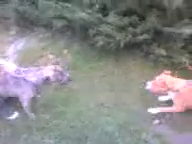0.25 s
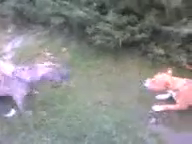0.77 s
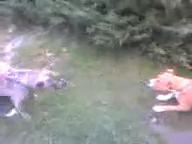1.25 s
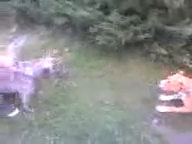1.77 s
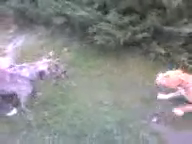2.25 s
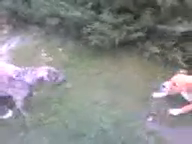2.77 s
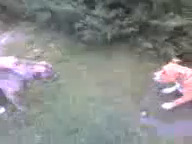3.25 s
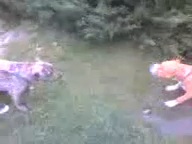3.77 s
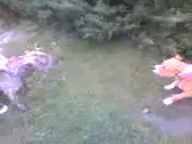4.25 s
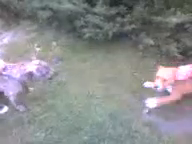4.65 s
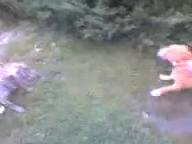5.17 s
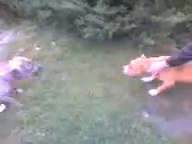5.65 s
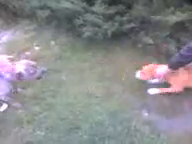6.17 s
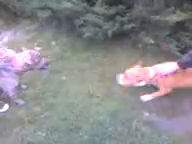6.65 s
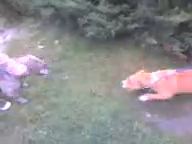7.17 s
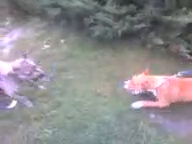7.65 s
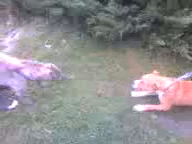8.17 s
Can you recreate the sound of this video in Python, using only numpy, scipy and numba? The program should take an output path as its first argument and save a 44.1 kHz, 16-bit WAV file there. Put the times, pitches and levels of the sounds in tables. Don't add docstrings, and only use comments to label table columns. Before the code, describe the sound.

Rough falling barks and sharp rising yelps from two excited dogs, with huffs and thin breaths in short pauses, crackly and dull.

```python
import sys
import numpy as np
from scipy import signal
from scipy.fft import rfft, irfft
from scipy.io import wavfile
from scipy.ndimage import uniform_filter1d
from numba import njit

SR = 44100
rng = np.random.default_rng(int(sys.argv[2]) if len(sys.argv) > 2 else 0)


def voltage_ratio(level):
    return 10 ** (np.asarray(level, float) / 20)


def digitize_waveform(pressure):
    field = np.atleast_2d(pressure).T
    bounded = np.clip(field, -1, 1)
    quanta = np.round(bounded * 32767).astype(np.int16)
    wavfile.write(sys.argv[1], SR, quanta)


N = 370881

# start_s, hold_s, level_db, pitch_hz, glide_octaves_per_s
BARKS = [(0.597, .047, -8.5, 749, -4.5), (0.665, .012, -15.5, 727, 0.8), (0.772, 0.018, -7, 669, 8.5),
         (1.476, .04, -10.5, 610, 3.4), (3.645, .05, -24, 700, -1.5), (5.066, .015, -31, 700, -3),
         (5.05, .04, -36, 320, -1.5), (5.685, 0.033, -9.5, 688, -5), (6.53, .05, -23.5, 927, -5),
         (7.96, 0.022, -25.5, 913.6, -2.5), (6.7, 0.028, -10.5, 696.5, -2.7), (7.335, .06, -12, 520, -1.6),
         (6.075, .085, -16, 1220, -1.5), (6.175, .04, -20, 470, -2.2), (0.752, .012, -21, 600, 3),
         (1.461, .008, -22, 600, .3), (6.655, .012, -24, 640, .3), (8.11, 0.048, -11.5, 1070, 1.07)]
# start_s, hold_s, level_db, pitch_hz, glide_octaves_per_s
ROARS = [
    (1.545, 0.037, -14.5, 491.6, 2),
    (2.914, 0.09, -8, 630, -5),
    (3.69, .03, -21, 597.6, -0.5),
    (3.76, .09, -8.5, 640, -6),
    (5.73, .05, -13.5, 523.4, 1.66),
    (6.424, .012, -15.5, 661, -4.5),
    (6.465, 0.022, -9, 542, -4),
]
# start_s, hold_s, level_db, pitch_hz, glide_octaves_per_s
SWELLS = [
    (1.968, .05, -10, 580.6, -1.5),
    (2.275, 0.077, -9, 625, -1.5),
    (4.468, .035, -9, 655, -5.5),
    (6.095, 0.033, -10, 530, -1.1),
    (1.05, 0.033, -24, 574.3, -0.2),
    (7.625, .05, -15, 486.2, 4),
    (7.884, .03, -13, 670, -6),
]
# start_s, hold_s, level_db, pitch_hz, glide_octaves_per_s
YELPS = [(0.0, 0.0021, -14, 1021, -6.5), (7.49, .065, -21, 580, .2), (1.62, 0.027, -8, 948, 1),
         (2.437, 0.068, -8, 727, 9), (3.3, .02, -17, 814.6, 7), (3.325, .04, -5.5, 950, 4),
         (4.342, 0.058, -8, 1029, 3.5), (1.095, 0.034, -29, 1069, -12.5), (5.22, .035, -28, 555.5, 7),
         (8.185, .025, -23, 860, -9), (6.222, 0.046, -12.5, 689, 6), (6.288, .05, -6, 900, 5),
         (7.29, .028, -6, 968, 6.5), (8.135, 0.035, -8, 418, 4.5)]
# start_s, hold_s, level_db, pitch_hz, glide_octaves_per_s
HOOTS = [
    (0.792, 0.025, -15.5, 416.3, 3.5),
    (0.908, 0.0096, -21, 521, 2.5),
    (1.0, 0.027, -23.5, 658.5, 7.5),
    (2.584, 0.0043, -16.5, 498, -7.5),
    (3.276, 0.013, -8, 678, 9.5),
    (5.17, 0.039, -34, 450.8, 4.5),
    (6.405, 0.0097, -22.5, 484, 0.6),
    (6.678, 0.014, -7, 686.5, 1.5),
]
# start_s, hold_s, level_db, pitch_hz, glide_octaves_per_s
CRIES = [
    (0.825, 0.02, -10.5, 465.3, 7),
    (6.755, 0.03, -13.5, 525.6, 6),
    (7.232, .013, -11.5, 597, 2),
    (8.375, 0.036, -23, 575, -1.4),
]
# start_s, hold_s, level_db, pitch_hz, glide_octaves_per_s
ARCHES = [
    (0.485, 0.038, -20, 541, 1.2),
    (1.72, .05, -19.5, 511.6, 3.5),
    (2.09, 0.024, -20.5, 543, -1.8),
]
# start_s, hold_s, level_db, pitch_hz, glide_octaves_per_s
WHINES = [
    (0.16, .13, -44, 298.3, -1.4),
    (0.3, 0.13, -46.5, 263.4, 1.9),
]
# start_s, hold_s, level_db, pitch_hz, glide_octaves_per_s
HUMS = [
    (3.97, .19, -49, 255, -0.21),
    (4.23, .07, -64, 221.3, -0.43),
    (4.85, .045, -58.5, 859.6, 0.58),
    (5.87, 0.21, -37.5, 337, -0.64),
]
# time_s, pulse_rate_hz, level_db
GROWL = [
    (3.945, 133.6, -50),
    (3.977, 126.2, -36),
    (4.05, 111.1, -61.5),
]
# start_s (full breath), hold_s, level_db, mouth_hz, brightness_db
PANTS = [(0.05, 0.045, -30.5, 492, 8), (0.114, 0.099, -35.5, 650, 4.5), (1.885, 0.039, -26, 698, 0),
         (6.002, 0.041, -34.5, 455, 2.5), (7.261, 0.023, -21, 1101, 5.5), (7.579, .03, -20.5, 698, 5.5),
         (0.891, 0.1, -28.5, 930, 5), (2.628, 0.073, -36, 1053, 14), (3.17, 0.1, -51.5, 640, 4.5),
         (3.39, 0.015, -36.5, 800, -0.5), (3.438, .012, -24.5, 600, 3.5), (3.499, 0.043, -36.5, 787, 10),
         (4.26, 0.031, -67, 1040, 6), (4.676, 0.024, -39, 850, 4.5), (4.814, 0.068, -66.5, 950, -9),
         (4.915, 0.026, -51.5, 991, 8), (5.322, .01, -54, 320, -33), (5.499, .05, -57, 450, -6),
         (5.617, 0.0032, -39.5, 730, 1.5), (6.94, 0.038, -49, 340, 7.5), (8.248, 0.16, -30.5, 690, 11.5),
         (7.176, .012, -58, 400, 4.5), (4.189, .008, -57, 500, 15)]
# start_s, hold_s, hiss_db, rasp_db
SIGHS = [
    (0.046, .11, -46.5, -57),
    (0.93, .08, -51, -47.5),
    (1.093, 0.12, -86, -45.5),
    (3.12, .07, -55.5, -50),
    (3.45, .1, -53.5, -43),
    (5.424, .1, -63, -86),
    (5.54, 0.074, -49, -62),
    (6.852, 0.54, -74.5, -51.5),
    (8.227, .08, -53.5, -44),
]
# rise_db_per_s, droop_db_per_s (while held), fall_db_per_s,
# pitch_db_per_breath_db, voice_db, brightness_db, second_partial_db
BARK_WAY = (800, 52, 297, 0.58, -5, 2.5, -4.5)
ROAR_WAY = (799.5, 51, 299.5, 0.24, -4.5, 1, 4)
SWELL_WAY = (349.5, 59.5, 185, 0.2755, -6, 1, -4.5)
YELP_WAY = (900.5, -27, 1300.5, 0.11, -3.5, -2.5, 4.5)
HOOT_WAY = (698.5, 6, 1098.5, 0.24, -3, -2, -19)
CRY_WAY = (601.5, -30.5, 1300.5, 0.18, -2, -6, 12.5)
ARCH_WAY = (261, 7, 257.5, .22, -5.5, -5, 3.5)
WHINE_WAY = (500, 5, 500, .01, -5, -5, -12)
HUM_WAY = (300, 40, 300, .01, -6, -3, -35)
# rise_db_per_s, droop_db_per_s, fall_db_per_s
PANT_WAY = (1800, 90, 1200)
SIGH_WAY = (470, 9.1, 400)
ROUGH = [(BARKS, BARK_WAY), (ROARS, ROAR_WAY), (SWELLS, SWELL_WAY)]
CLEAR = [(YELPS, YELP_WAY), (HOOTS, HOOT_WAY), (CRIES, CRY_WAY), (ARCHES, ARCH_WAY)]
SOFT = [(WHINES, WHINE_WAY), (HUMS, HUM_WAY)]
# centre_hz, width_hz, level_db
THROAT = [(120, 780, -21), (386, 151, -7), (542, 170, -5), (760, 360, -4), (987, 130, -1), (1245, 176, 0)]
# centre_hz, width_hz, level_db
RASP = [(1782, 130, -5), (2079, 260, -14), (2305, 150, -12)]
# centre_hz, width_hz, level_db
HISS = [(2935, 250, 2.5), (3480, 390, -8), (4600, 700, -24)]
# partial_hz, strength_db
TRACT = [(250, -19), (450, 0.5), (620, -1), (900, 0.5), (1080, 3), (1300, -5), (1900, -22.5), (2400, -31.5)]
# centre_hz, half_width_hz
GAPS = [(1558, 115), (2592, 85), (3235, 45), (4315, 110)]

TOP_HZ = 5520
AFTER_DB, AFTER_DB_S, STILL_DB = -22, 166, -73.5
RASP_DB, RASP_SLOPE, HISS_DB, HISS_SLOPE = -18.5, -0.15, -34, -0.24
MOUTH_TOP_HZ, MOUTH_REST_HZ = 1084, 850
VOICE_FADE = 1.512
SNAP_DB, SNAP_TIMES = -16, 7
SETTLE_S = .08


def level(x, db):
    return x * voltage_ratio(db) / np.sqrt(np.mean(x ** 2))


@njit
def svf(x, hz, width):
    y, b, l = np.empty(len(x)), 0., 0.
    for i in range(len(x)):
        g, k = np.tan(np.pi * hz[i] / SR), width / hz[i]
        v = (b + g * (x[i] - l)) / (1 + g * (g + k))
        b, l, y[i] = 2 * v - b, l + 2 * g * v, k * v
    return y


def flutter(hz):
    size = max(int(SR / hz), 2)
    noise = rng.standard_normal((2, N))
    a, b = uniform_filter1d(uniform_filter1d(noise, size), size)
    return (a + 1j * b) / np.sqrt(np.mean(a ** 2 + b ** 2))


def ring(x, modes, wander=0., patchy_db=0., wander_hz=25):
    out = 0
    for k, (hz, width, db) in enumerate(modes):
        drift = flutter(wander_hz)
        centre = hz * np.exp(wander * drift.real)
        once = svf(x, centre, 1. * width)
        twice = svf(once, centre, 1. * width)
        out = out + (-1) ** k * voltage_ratio(db + patchy_db * drift.imag) * twice
    return out


def hedge_echo(voices):
    t = np.arange(SR // 4) / SR
    hedge = rng.standard_normal(len(t)) * voltage_ratio(-60 * t / 0.2) * (t > .006)
    hedge = hedge / np.sqrt(np.sum(hedge ** 2))
    return voltage_ratio(-34.0) * signal.fftconvolve(voices, hedge)[:N]


def breath(t, s, hold, rise, droop, fall):
    held = np.clip(t - s, 0, max(hold, 0))
    early = rise * np.minimum(t - s, 0)
    snap = SNAP_TIMES * np.minimum(early - SNAP_DB, 0)
    return early + snap - droop * held - fall * np.maximum(t - s - held, 0)


def lungs():
    t = np.arange(0, N + 64, 64) / SR
    puffs = [(row, PANT_WAY) for row in PANTS]
    for rows, way in ROUGH + CLEAR + SOFT:
        for s, hold, db, hz, _ in rows:
            opens = 2 * hz < MOUTH_TOP_HZ and rows is not BARKS
            puffs.append(((s, hold, db, hz * (2 if opens else 1), way[-2]), way[:3]))
    power = voltage_ratio(STILL_DB) ** 2 + 0 * t
    mouth, bright = power * MOUTH_REST_HZ, 0 * t
    for (s, hold, db, mouth_hz, bright_db), (rise, droop, fall) in puffs:
        call = voltage_ratio(db + breath(t, s, hold, rise, droop, fall)) ** 2
        after = voltage_ratio(db + AFTER_DB + breath(t, s, hold, rise, 0, AFTER_DB_S)) ** 2
        mouth = mouth + call * mouth_hz + after * MOUTH_REST_HZ
        power = power + call + after
        bright = bright + call * bright_db
    effort_db = 10 * np.log10(power)
    sighs = sum(voltage_ratio(np.add.outer(db, breath(t, s, hold, *SIGH_WAY))) ** 2 for s, hold, *db in SIGHS) / power
    edge_db = np.array([HISS_DB + HISS_SLOPE * effort_db, RASP_DB + RASP_SLOPE * effort_db]) + bright / power
    hiss_db, rasp_db = 10 * np.log10(voltage_ratio(edge_db) ** 2 + sighs)
    curves = voltage_ratio(effort_db), mouth / power, rasp_db, hiss_db
    return [np.interp(np.arange(N) / SR, t, curve) for curve in curves]


def hoarse(effort, voiced_power, mouth_hz, rasp_db, hiss_db):
    slaps = 1 + 0.36 * np.abs(flutter(420)) ** 2
    air, rasp, hiss = slaps * rng.standard_normal((3, N))
    mouth = svf(svf(air, mouth_hz, 250.0), mouth_hz, 250.0)
    throat = ring(air, THROAT, wander=0.21, patchy_db=1.5)
    low = level(level(mouth, 0) + level(throat, 0), 0)
    left = np.sqrt(np.maximum(effort ** 2 - voiced_power, effort ** 2 / 40))
    rasp = voltage_ratio(rasp_db) * level(ring(rasp, RASP, wander=0.035, patchy_db=7.5), 0)
    hiss = voltage_ratio(hiss_db) * level(ring(hiss, HISS, wander=0.05, patchy_db=-10), 0)
    return left * low + effort * (rasp + hiss)


def growl():
    s, hz, db = np.transpose(GROWL)
    t = np.arange(N) / SR
    cycles = np.cumsum(np.interp(t, s, hz)) / SR
    pulses = np.diff(np.floor(cycles), prepend=0)
    body = ring(pulses, [(660, 230, 3.5), (325, 450, -8.0), (1164, 530, -18)])
    return level(body, 0) * voltage_ratio(np.interp(t, s, db, -150, -150))


def voiced(kinds):
    tract_hz, tract_db = np.transpose(TRACT)
    tables = []
    for (s, hold, db, hz, glide), way in [(row, way) for rows, way in kinds for row in rows]:
        rise, droop, fall, follow, voice_db, _, second_db = way
        t = np.linspace(s - 18 / rise, s + hold + 25 / fall, num=24)
        fade_db = breath(t, s, hold, rise, droop, fall)
        octaves = glide * SETTLE_S * (1 - np.exp(-(t - s) / SETTLE_S))
        pitch = hz * 2 ** octaves * voltage_ratio(follow * np.minimum(fade_db, 0))
        lend_db = np.interp(np.log([pitch, 2 * pitch]), np.log(tract_hz), tract_db)
        lend = voltage_ratio(lend_db + [[0], [second_db]])
        share_db = 10 * np.log10(lend ** 2 / np.sum(lend ** 2, axis=0))
        partials_db = db + voice_db + VOICE_FADE * fade_db + share_db
        tables.append(np.column_stack([t, pitch, *partials_db]))
    return tables


def calls(tables, rough, flutter_hz, third_db, edge_s):
    sound, power = np.zeros(N), np.zeros(N)
    rough = np.clip(rough, 0, 1)
    smear = [np.sqrt(1 - rough ** 2) + rough * flutter(flutter_hz) for _ in range(3)]
    for table in tables:
        s, hz, first_db, second_db = np.transpose(table)
        i = np.arange(max(int((s[0] - edge_s) * SR), 0), min(int((s[-1] + edge_s) * SR), N))
        t = i / SR
        edge = np.clip(np.minimum(t - s[0], s[-1] - t) / (2 * edge_s) + .5, 0, 1)
        pitch = np.interp(t, s, hz)
        phase = 2 * np.pi * np.cumsum(pitch) / SR
        for k, db in enumerate((first_db, second_db, second_db + third_db)):
            gain = edge * voltage_ratio(np.interp(t, s, db))
            sound[i] += np.sqrt(2) * gain * np.imag(smear[k][i] * np.exp(1j * (k + 1) * phase))
            power[i] += gain ** 2 * ((k + 1) * pitch < GAPS[0][0])
    return sound, power


def scene():
    effort, *colour = lungs()
    barks, bark_power = calls(voiced(ROUGH), rough=.72, flutter_hz=170, third_db=-8.5, edge_s=.008)
    yelps, yelp_power = calls(voiced(CLEAR), rough=.25, flutter_hz=200, third_db=-22, edge_s=.004)
    whines, whine_power = calls(voiced(SOFT), rough=.62, flutter_hz=70, third_db=-15, edge_s=.01)
    power = bark_power + yelp_power + whine_power
    pull = np.minimum(effort / np.sqrt(power + 1e-12), 1.7)
    voices = (barks + yelps + whines) * pull + growl()
    puffs = hoarse(effort, power * pull ** 2, *colour)
    return (voices + hedge_echo(voices) + puffs)[None]


def thrifty_camera(x, below_db, floor_db, skip):
    hz, _, frames = signal.stft(x, SR, nperseg=512)
    size = uniform_filter1d(np.abs(frames), size=5, axis=0)
    faint = (size < voltage_ratio(below_db) * size.max(axis=0)) | (size < voltage_ratio(floor_db))
    frames[faint] = 0
    band = np.searchsorted([1080] + [centre for centre, _ in GAPS], hz)
    luck = rng.random((band.max() + 1, frames.shape[1] // 2 + 1))
    luck = np.repeat(luck, 2, axis=1)[:, :frames.shape[1]]
    frames[luck[band] < skip * band[:, None]] = 0
    lines = rfft(signal.istft(frames, SR, nperseg=512)[1][:N])
    hz = np.arange(len(lines)) * SR / N
    for centre, half in GAPS:
        lines *= np.clip((np.abs(hz - centre) - half) / 70 + .5, .001, 1)
    return irfft(lines * (hz < TOP_HZ) * hz / (hz + 40), N)


def roll_off(x):
    return signal.sosfilt(signal.butter(12, 15850, fs=SR, output="sos"), x)


def record(dry):
    overload = .84 * np.tanh(np.abs(dry[0] / .84) ** 4) ** .25 * np.sign(dry[0])
    x = thrifty_camera(overload, below_db=-59, floor_db=-101.5, skip=0.046)
    clipped = np.clip(x[::2], -.715, .715)
    joined = signal.resample_poly(clipped, 2, 1, window=signal.firwin(11, .55))[:N]
    joined = joined + level(rng.standard_normal(N), -95)
    return roll_off(joined[None])


dry = scene()
out = record(dry)
digitize_waveform(out)
```